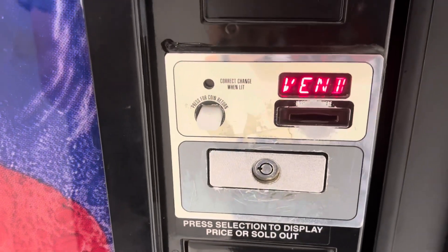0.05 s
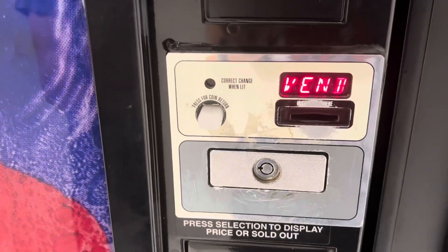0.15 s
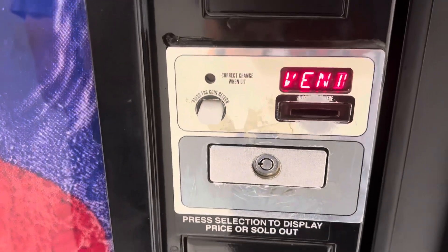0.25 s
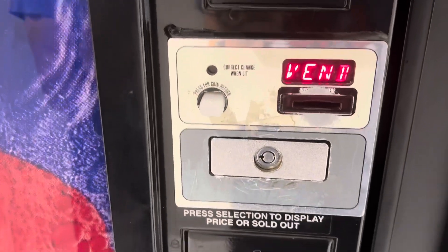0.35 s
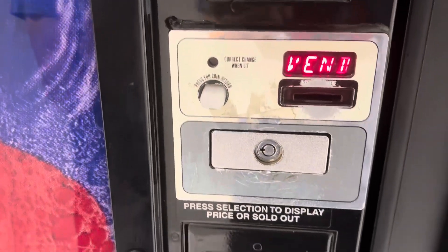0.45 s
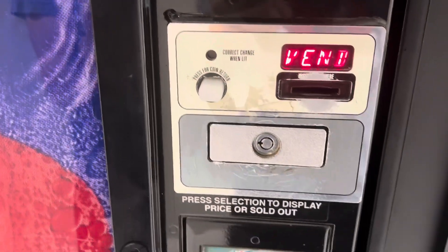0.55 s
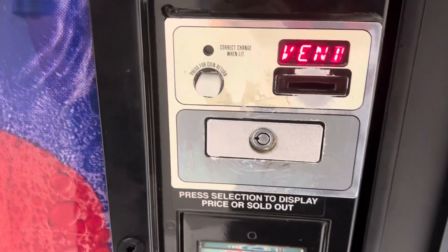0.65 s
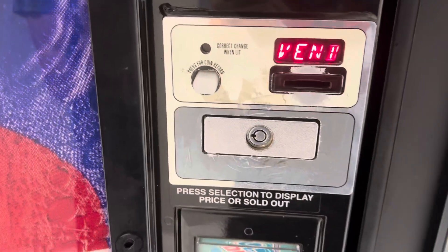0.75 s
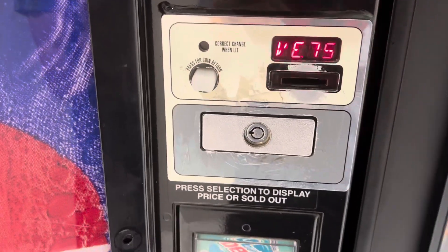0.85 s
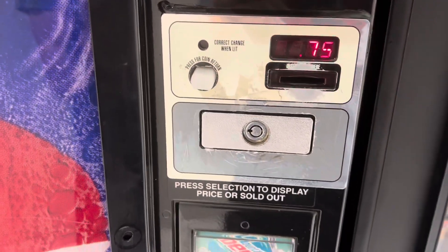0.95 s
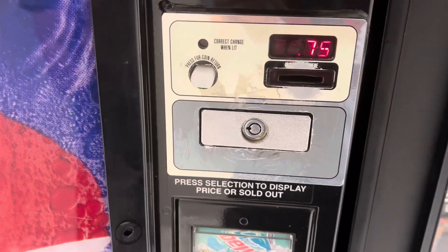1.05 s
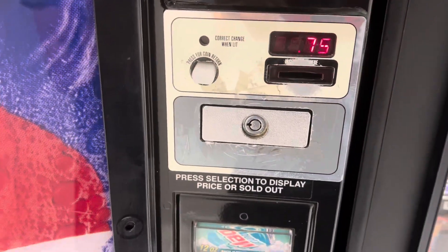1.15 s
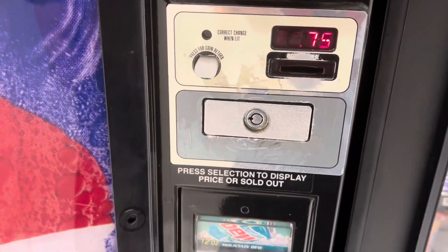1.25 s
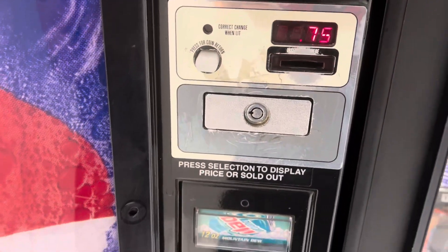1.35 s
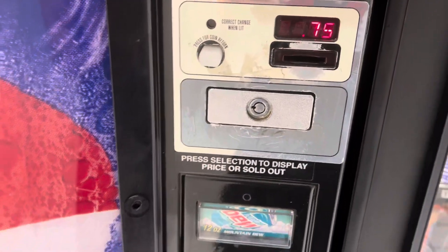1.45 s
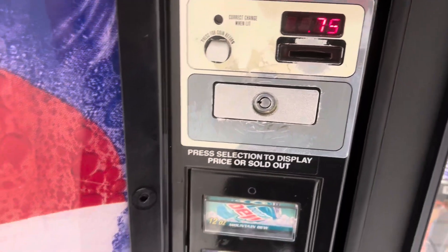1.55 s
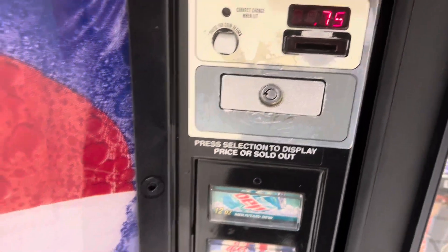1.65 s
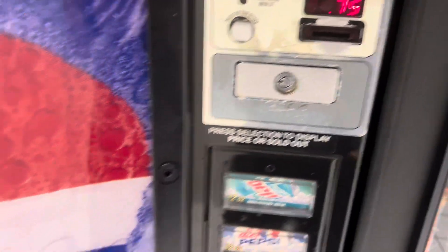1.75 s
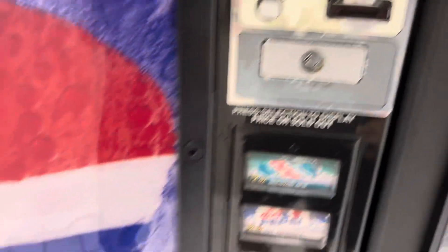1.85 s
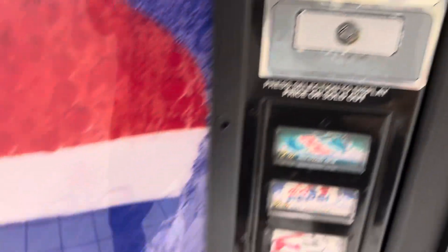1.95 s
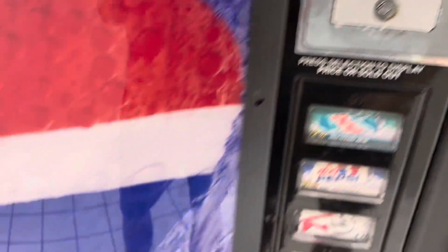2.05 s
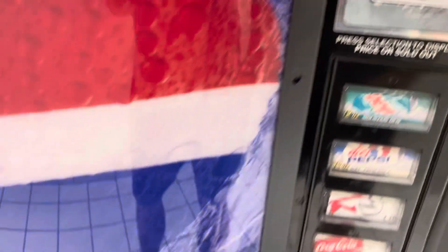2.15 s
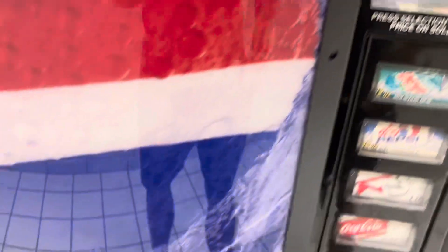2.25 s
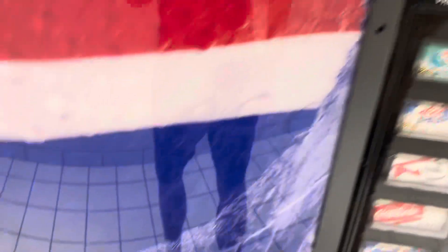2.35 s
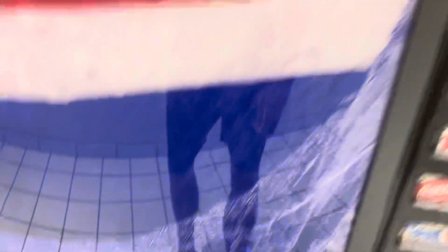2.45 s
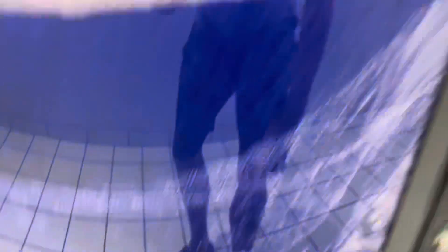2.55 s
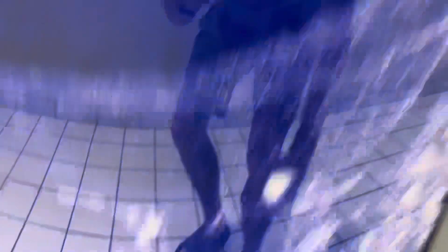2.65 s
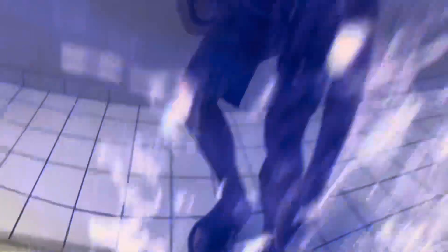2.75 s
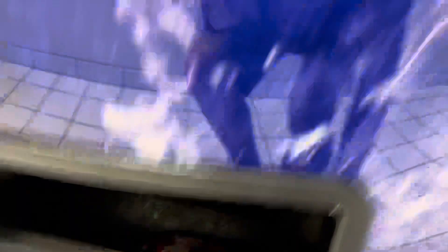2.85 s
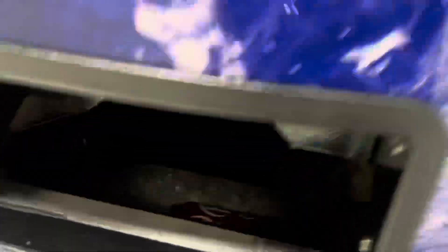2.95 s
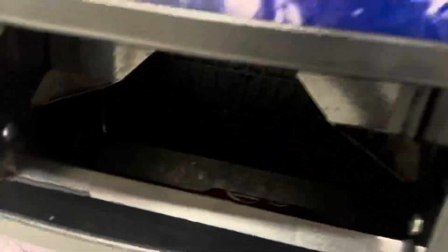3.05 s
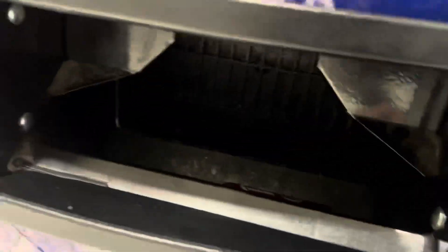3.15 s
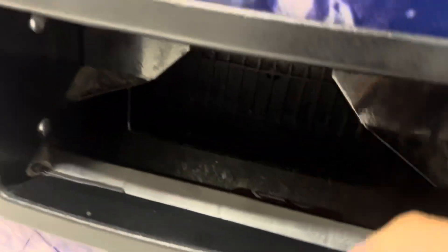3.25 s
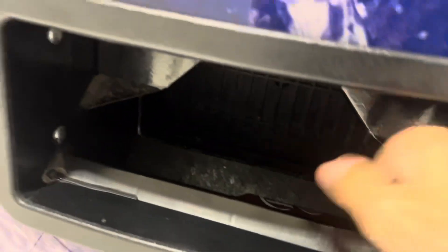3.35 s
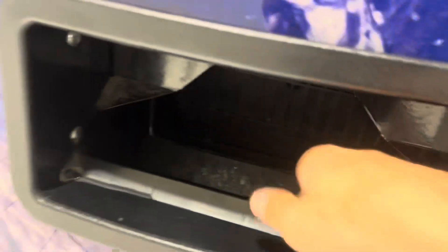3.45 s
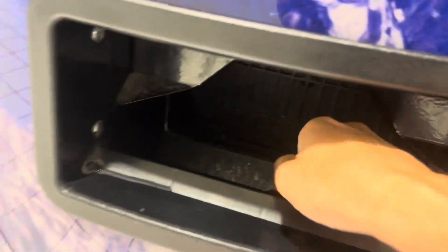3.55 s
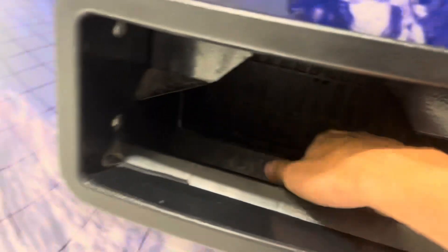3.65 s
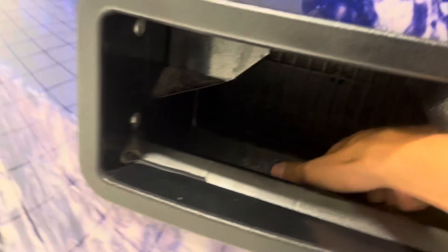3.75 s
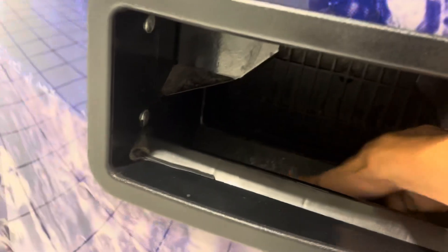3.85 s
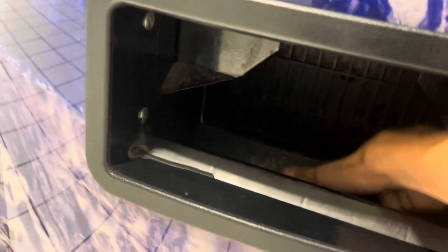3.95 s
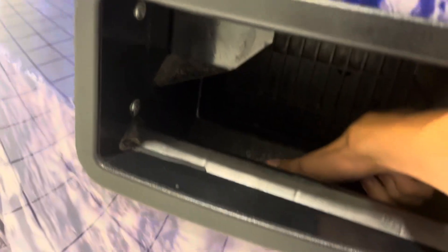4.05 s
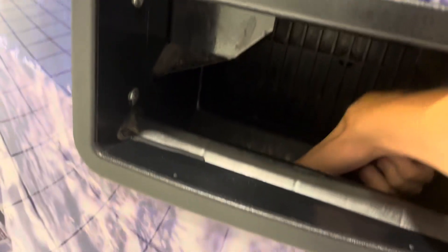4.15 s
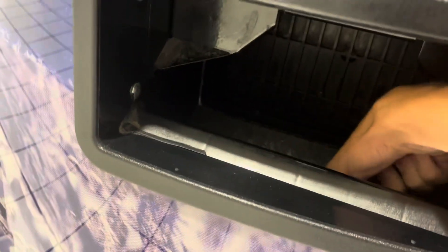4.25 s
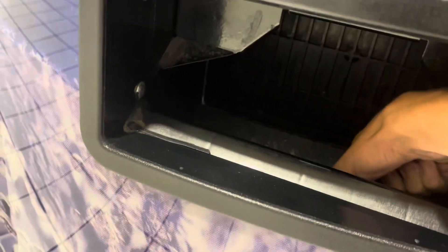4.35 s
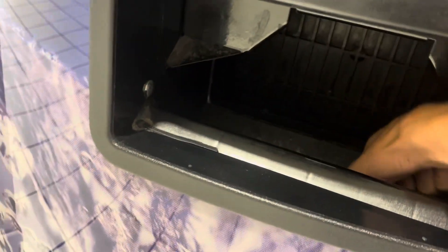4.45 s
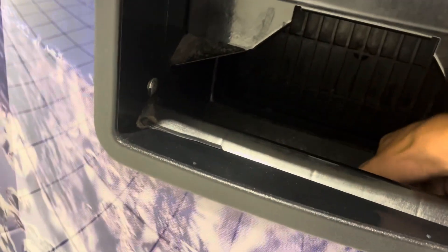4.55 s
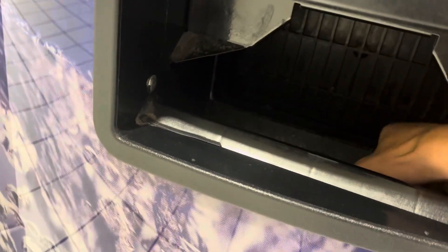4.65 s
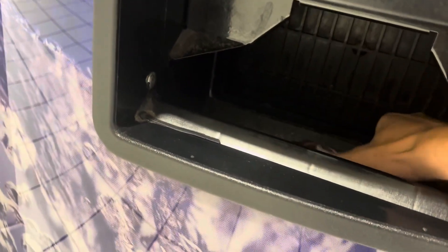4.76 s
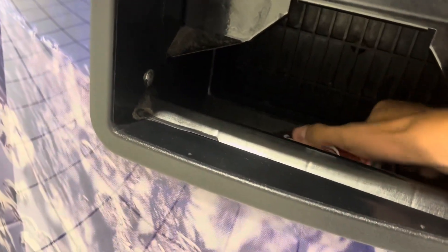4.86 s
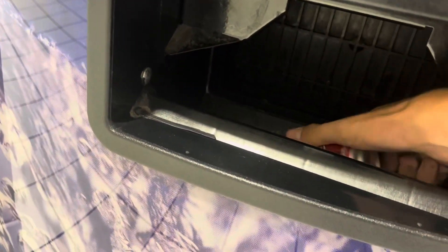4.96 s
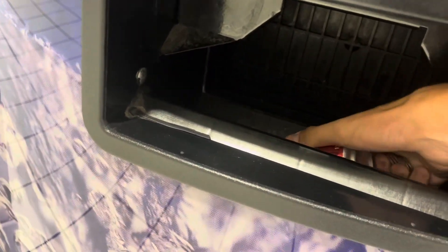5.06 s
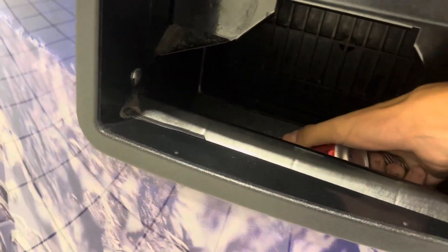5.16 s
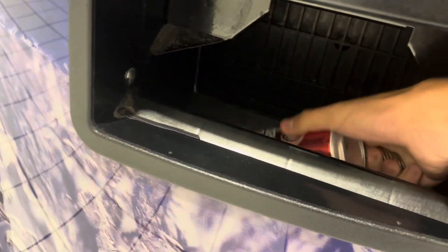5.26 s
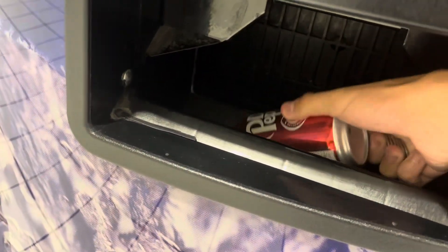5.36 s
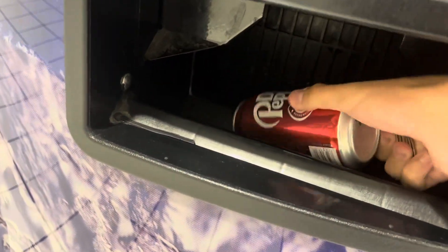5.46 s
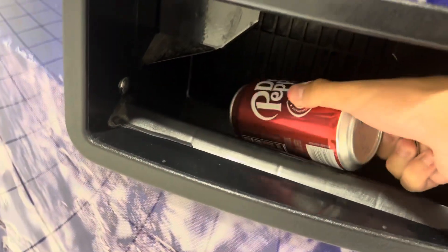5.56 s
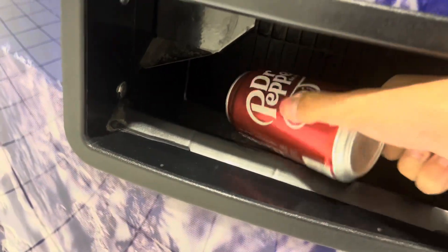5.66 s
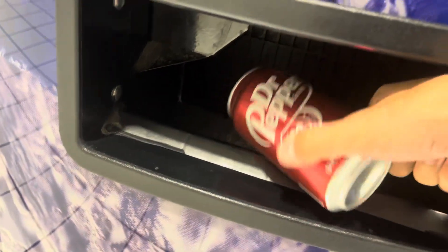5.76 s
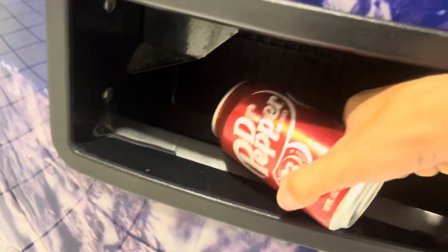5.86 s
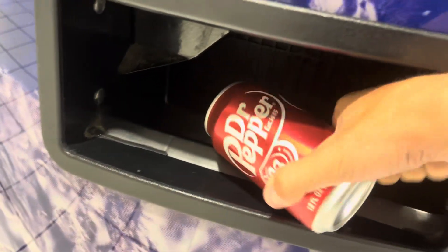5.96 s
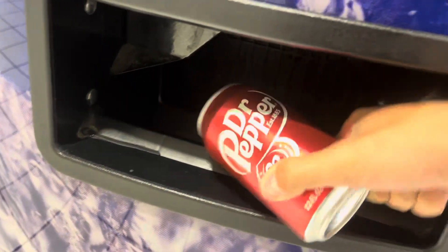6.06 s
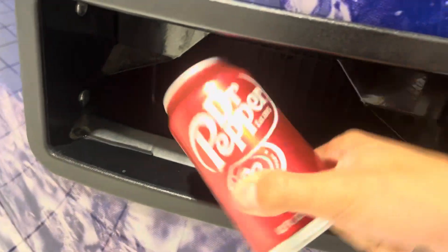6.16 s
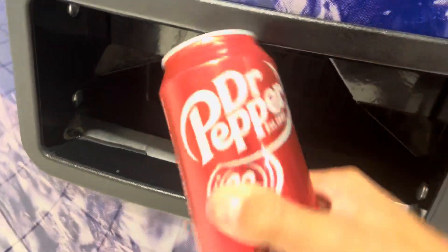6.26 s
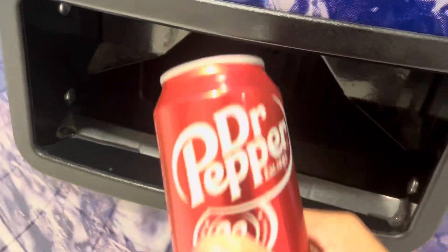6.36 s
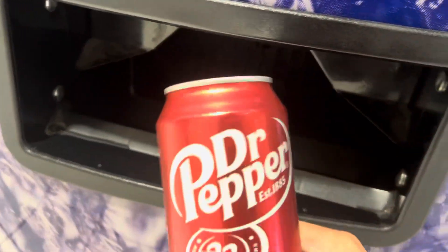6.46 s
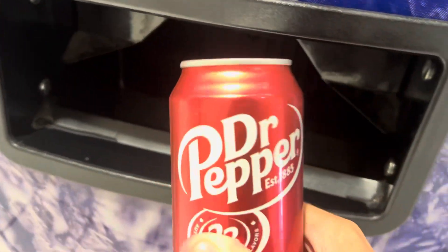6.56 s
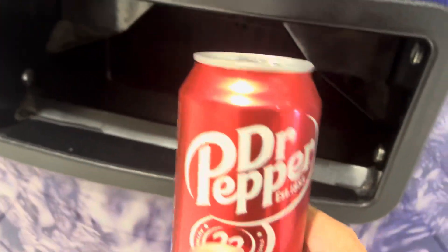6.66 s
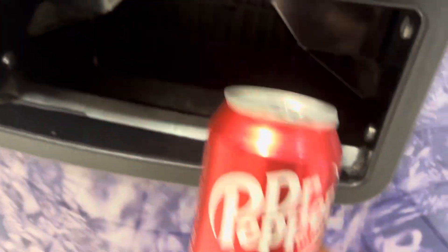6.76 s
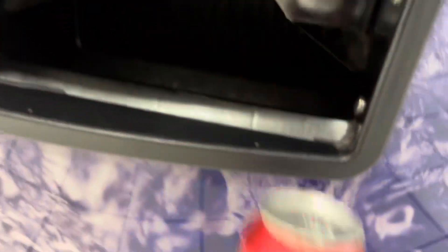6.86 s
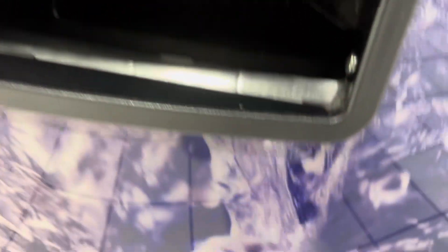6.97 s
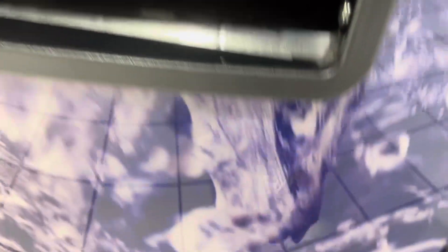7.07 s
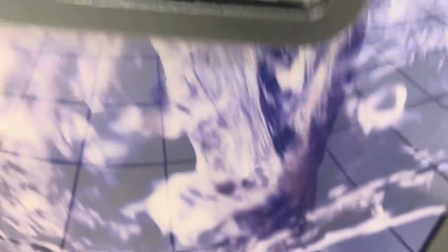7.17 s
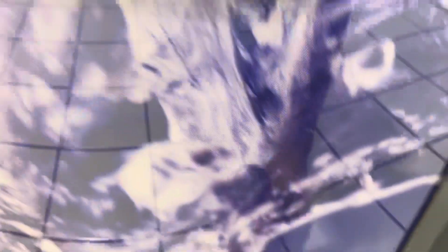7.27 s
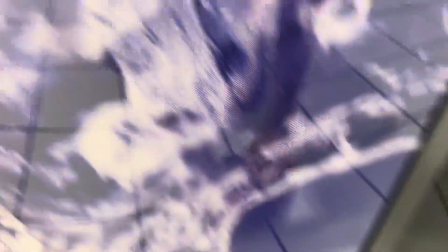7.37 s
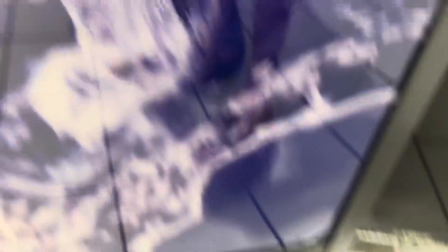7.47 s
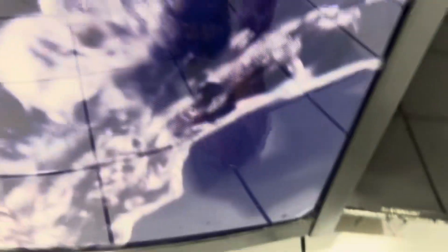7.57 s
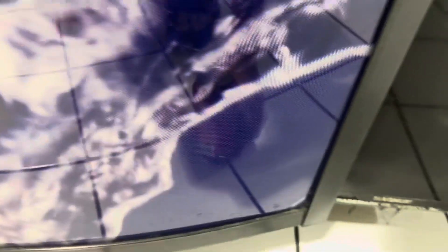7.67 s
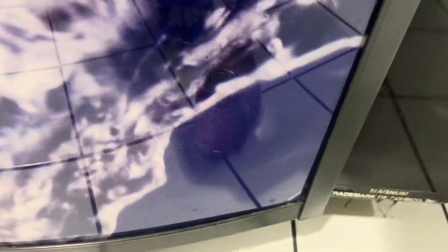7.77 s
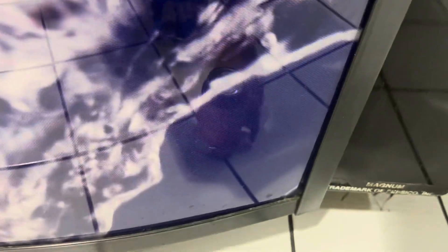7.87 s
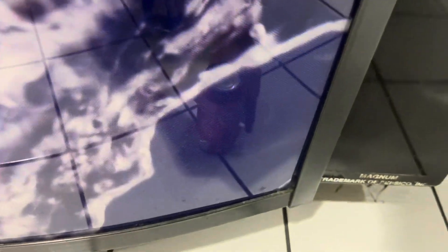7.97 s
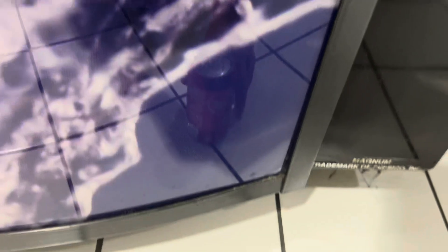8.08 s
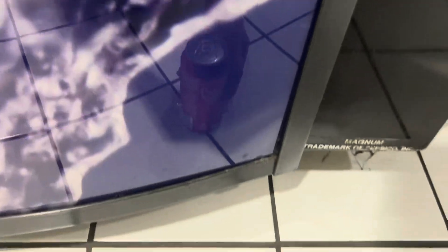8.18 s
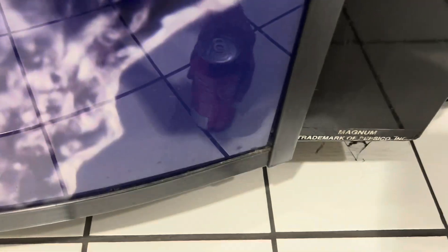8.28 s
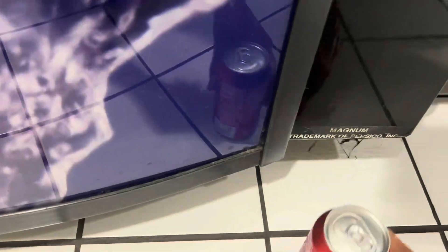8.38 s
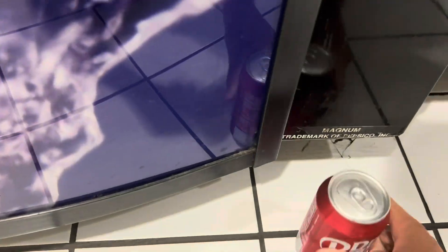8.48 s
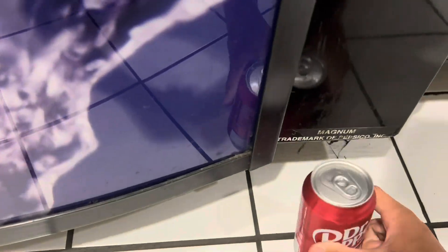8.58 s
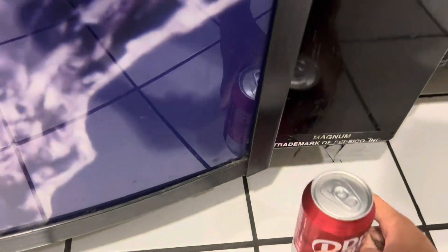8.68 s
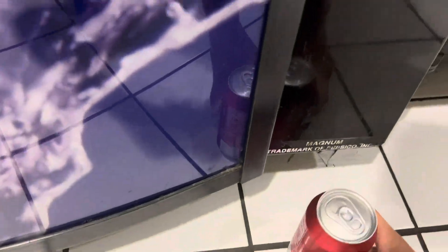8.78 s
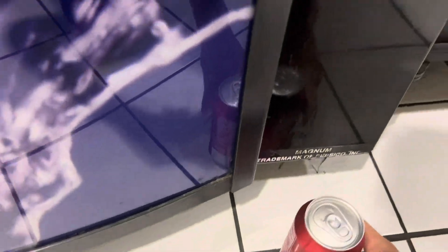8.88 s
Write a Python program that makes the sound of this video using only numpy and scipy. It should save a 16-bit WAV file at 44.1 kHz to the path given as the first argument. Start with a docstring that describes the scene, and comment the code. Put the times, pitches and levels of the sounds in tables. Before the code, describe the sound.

Throughout, a cooler hums: low mains tones throbbing slowly, wavering motor notes and patchy, dark fan noise, growing a little as the microphone nears the bin around 3 s. At 0.6 s a full can starts rattling down the sheet-steel chute; the heaviest hollow bang comes at 1.0 s, with bouncing clatter dying out by about 1.5 s. Only hum and a tiny tick follow until 3.35 s, when a knock with a low thump sounds in the bin. A duller knock comes at 3.9 s, soft rustling from 4.1 s, a solid thud at 4.55 s and the loudest, sharp bang at 4.94 s. Lighter bumps follow at 5.8 and 6.2 s. At 7.4 s the hand-damped can taps tile; from 7.8 s it rocks in a quick, brighter clinking flurry, then scrapes in short gritty strokes around 8.2-8.5 s, with a last tap at 8.76 s. Close, short indoor reflections.

```python
"""Under everything a cooler hums: wavering motor tones over patchy fan noise, heard by a moving hand-held camera.
A full can drops down a vending machine's chute: cracks, thuds and rattling noise ring modes of sheet steel.
A hand then fumbles it out of the steel bin, with more knocks, light ticks and a soft noise rustle.
Last it is stood on a tiled floor, where it rocks and slides: taps and grinding noise ring its wall and rim,
damped by the fingers at first, then free."""
import sys
import numpy as np
from scipy import signal
from scipy.fft import rfft, irfft, next_fast_len
from scipy.io import wavfile
from scipy.ndimage import uniform_filter1d, minimum_filter1d

SR = 44100
rng = np.random.default_rng(int(sys.argv[2]) if len(sys.argv) > 2 else 0)


def volts_from_decibels(level):
    """Turn decibel levels (scalar or array-like) into linear amplitude factors."""
    exponent = np.asarray(level, float) / 20
    return 10 ** exponent


def output_pcm(signal):
    """Save a mono or channel-first signal as 16-bit PCM at the path in sys.argv[1].

    Samples are clipped to [-1, 1] before scaling.
    """
    pcm = np.clip(np.atleast_2d(signal).T, -1, 1) * 32767
    wavfile.write(sys.argv[1], SR, np.round(pcm).astype(np.int16))


N = 393357  # length in samples

# spectrum of fans and room: hz, relative_level_db (per Hz)
AIR_SPECTRUM = [(25, -42), (49, 13), (69, -0.5), (123, -2), (297, -5), (400, -12), (700, -18.5),
                (1000, -18), (1720, -20.5), (2240, -38), (5000, -42.5), (8800, -52.5), (14400, -53)]
# left-right likeness of the air noise: hz, correlation (-1 to 1)
AIR_LIKENESS = [(60, 0.97), (180, 0.83), (530, 0.79), (1580, -0.17), (4700, 0.6), (14000, 0.2)]
# cooler hiss, loudest at the open bin: mode_hz, width_hz, relative_level_db
HISS_MODES = [(2490, 710, -10.5), (3340, 550, -10), (5100, 5100, -26.5)]
# camera moves down to the bin and beside it: time_s, distance_m (to a reflecting surface), closeness_db (to cooler)
CAMERA_PATH = [(.3, 1.33, -3.5), (2.3, 1.29, -2), (2.75, 1.01, -1), (3.1, 0.97, 1), (4.299, 0.84, 1),
               (5.4, 0.91, -1), (6.7, 0.87, -1.5), (7.2, 1.01, 0.5), (8.1, 1.065, 1.5), (8.6, 1.08, 0)]
# slowly throbbing mains tones: pitch_hz, level_db, throb_depth (0-1), throb_phase_rad
MAINS_TONES = [(60, -43, 0.17, 1.6), (120.5, -35, 0.28, 2.6)]
# compressor orders meeting their own reflection: pitch_hz, level_db, reflected_share (0-1), reflection_phase_rad
MOTOR_ORDERS = [(236.5, -49.5, 1, -2.5), (291.5, -42.5, 0.69, -3), (355.3, -43.5, 0.56, 3.5)]
AIR_DB, HISS_DB = -33, -60
AIR_FOLLOWS, TONES_FOLLOW = 0.48, 0.85  # shares of the closeness in dB
THROB_S = 2.84  # period

# hand and sleeve moving near the microphone: start_s, length_s, level_db, rise_s
RUSTLES = [(4.112, 0.18, -51.5, 0.18), (4.386, 0.68, -63, 0.071), (5.172, .47, -59.5, 0.033),
           (6.045, 0.057, -55, 0.01)]

# can base on tile: start_s, strike_db, ring_centre_hz, rim_db (relative to the strike)
TILE_TAPS = [(7.393, -12.5, 844, -2), (7.421, -19, 835, -10.5), (7.438, -20, 830, -26),
             (7.452, -26, 825, -5), (7.789, -9.5, 1780, -15.5), (7.813, -17.5, 2570, -9.5),
             (7.822, -17.5, 2630, -22), (7.848, -14.5, 2570, -5), (7.879, -16, 2630, -10.5),
             (7.903, -15, 2500, -10.5), (7.929, -20.5, 2760, -8), (7.939, -22, 2760, -10),
             (7.957, -22, 2750, -12), (8.285, -17, 1320, -6), (8.361, -24, 2650, -4.5),
             (8.483, -18, 1460, -29), (8.495, -38, 2700, 15), (8.762, -13, 1360, -37),
             (8.77, -25, 2280, -8)]
# can grinding on tile: start_s, length_s, level_db, rise_s
TILE_GRINDS = [(7.43, 0.085, -38, 0.021), (7.59, 0.031, -44.5, 0.014), (7.798, 0.18, -33.5, 0.068),
               (8.09, 0.15, -39.5, 0.065), (8.195, 0.077, -27, 0.042), (8.277, 0.11, -29.5, 0.043),
               (8.39, 0.074, -29.5, 0.0091), (8.758, 0.022, -32.5, 0.0029)]
# can leaning as it slides, so the ring moves between wall modes: time_s, centre_hz
CAN_LEAN = [(8.26, 2310), (8.29, 1320), (8.33, 2700), (8.42, 2700), (8.445, 1320)]
# can wall: mode_hz, width_hz, relative_level_db
CAN_MODES = [(885, 73, -4.5), (1320, 97, 13), (1917, 62, 1.5), (2230, 114, 9), (2654, 130, 10),
             (2804, 200, 5), (4070, 420, 0), (4670, 330, 4), (7430, 2400, -9.5)]
# stiff base rim of the can: mode_hz, width_hz, relative_level_db
RIM_MODES = [(5130, 150, 15.5), (7600, 240, -12), (12000, 5600, 7)]
# fingers damp some can wall modes and free others: change_db, one for each can mode
GRIP_CHANGE_DB = [15, -0.5, 13, -0.5, -17, 9, -14, 4, 1]
LET_GO_S = 7.7  # until then the hand grips the can
RIM_HELD_HZ, RIM_FREE_HZ = 5150, 4830
GRIND_T60_S = 0.16

# can against chute and bin: start_s, thud_drive_db, thud_centre_hz, crack_drive_db, crack_centre_hz
STEEL_KNOCKS = [(0.852, -6.5, 272, -32, 970), (0.897, -7.5, 403, -33, 1010), (0.997, 4.5, 344, -12, 1380),
                (1.146, -5, 406, -30, 1300), (3.345, -11.5, 292, -23.5, 2210),
                (3.894, -8.5, 223, -27, 1350), (4.126, -20, 337, -43, 1190), (4.262, -22.5, 300, -42, 700),
                (4.556, 0.5, 238, -19.5, 830), (4.647, -6, 292, -23.5, 2600), (4.796, -15, 259, -25, 2150),
                (4.9391, 5.5, 300, -7.5, 1250), (5.836, -10, 237, -33.5, 1400),
                (6.221, -15.5, 227, -28, 795)]
# can sliding and rattling on steel: start_s, length_s, force_db, slip_db, cabinet_weight_db
STEEL_TUMBLES = [(0.609, 0.018, -13, -2.5, -20), (0.626, 0.068, -10.5, -3.5, -24.5),
                 (0.734, 0.29, -22, -5.5, -23.5), (0.847, 0.01, -25, 14, -32),
                 (0.9, 0.031, -28.5, 13.5, -30), (0.945, 0.061, -23.5, 6, -14),
                 (1.005, 0.053, -12, 6.5, -21), (1.049, 0.032, -18.5, 7.5, -12.5),
                 (1.109, 0.079, -11.5, -3.5, -27.5), (1.19, 0.018, -19.5, 2, -20.5),
                 (1.223, 0.027, -17.5, 3.5, -27.5), (1.323, 0.093, -29.5, -6, -25),
                 (1.462, 0.02, -21.5, -1.5, -44), (3.337, 0.045, -23, 5.5, -21),
                 (3.408, 0.045, -23.5, 1, -26), (4.634, 0.041, -23, -5, -21), (4.972, 0.016, -32, 7, -25),
                 (4.979, 0.033, -15.5, -11.5, -24), (6.218, 0.036, -16.5, 2, -21.5)]
# where the can rubs sets the strongest modes: time_s, clatter_centre_hz, clatter_db, panel_centre_hz
RUBBING_SPOT = [(.6, 890, 4.5, 273), (.8, 1340, 1.5, 344), (.85, 960, 4.5, 303), (1.2, 980, -1.5, 405),
                (3.3, 2130, -0.5, 298), (4.98, 1200, 8, 394), (6.2, 1890, -0.5, 286)]
# cabinet or panel mode left ringing by a blow: start_s, pitch_hz, level_db (before its rise)
BLOW_THUMPS = [(3.345, 60, -6), (4.65, 71, -16), (4.984, 81.7, -17), (4.991, 423, -17)]
# small bounces of the can rim and finger touches: start_s, drive_db, centre_hz
LIGHT_TICKS = [(0.639, -35, 1920), (0.862, -20.5, 4800), (1.095, -27, 7000), (1.2386, -41, 4500),
               (2.7204, -37, 6500), (3.378, -33.5, 6460), (3.413, -37.5, 6530), (3.5575, -43, 4000),
               (4.467, -37.5, 10800), (4.895, -40, 4140), (4.958, -33, 3200), (4.977, -37, 2630),
               (5.3564, -38.5, 3260), (6.227, -27.5, 2170), (6.238, -32, 3040)]
# cabinet: mode_hz, width_hz, relative_level_db
CABINET_MODES = [(86, 45, 2.5), (128.7, 36.3, 7)]
# sheet steel panel: mode_hz, width_hz, relative_level_db
PANEL_MODES = [(182, 33, 5.5), (258.4, 29, -0.5), (303, 31.4, 3.5), (387.7, 12.8, 4), (423, 17.5, -7.5),
               (601, 44, -11)]
# can shell and bin lip: mode_hz, width_hz, relative_level_db
CLATTER_MODES = [(661, 32, -0.5), (695, 110, 11), (916, 46, 9.5), (1190, 167, 5), (1380, 65, 2),
                 (1618, 75, 4.5), (1914, 65, 3.5), (2150, 60, 0.5), (2424, 120, -2), (2860, 110, -3),
                 (3385, 290, -5), (4110, 120, -7), (4800, 240, -9.5), (6800, 320, -24.5), (7900, 1200, -20),
                 (11600, 2100, -17)]
# bright scrape: hz, relative_level_db (per Hz)
SCRAPE_SPECTRUM = [(2000, -14), (3500, 4), (5000, -1.5), (8000, 2), (14000, 1)]
STEEL_RISE_S, STEEL_T60_S = 0.0021, 0.24
CABINET_RISE_S, CABINET_T60_S = 0.016, 0.34
CLATTER_DB, SCRAPE_DB = -16, -26  # relative to the force, before slip
SCRAPE_PER_SLIP = 2.06  # dB per dB: a fast slip brightens the sound
THUMP_RISE_S, THUMP_T60_S = 0.0057, 0.46
SNAP_DB, SNAP_T60_S = -11, 0.032  # bright edge, driven this far below its crack
FREE_T60_S, MOVING_T60_S = 0.15, 0.055  # rattle of a lone knock; one cut short by the moving can

# phase between the microphone ports: hz, left_lead_rad
PORT_PHASE = [(100, 0.2), (400, 0.15), (1240, 1.1), (2300, 0.55), (7000, 0.17), (9000, 2.61), (12500, 0.49)]
# level between the microphone ports: hz, left_over_right_db
PORT_LEVEL = [(200, 1), (1000, -1.3), (2600, 4), (10000, 0.5)]
# overall tone, with a notch in the treble: hz, relative_level_db
OVERALL_TONE = [(25, -21), (55, 2), (8900, 1), (9600, -16.5), (10700, -26.5), (11300, -12), (14000, -26),
                (15500, -44.5)]
ROOM_T60_S, ROOM_DB = 0.14, -8


def evened(x):
    """Scales to rms 1."""
    return x / np.sqrt(np.mean(x ** 2) + 1e-20)


def read(points, hz):
    """Reads a spectrum on a log-frequency axis."""
    f, value = np.transpose(points)
    return np.interp(np.log(hz + 1), np.log(f + 1), value)


def add(mix, s, sound):
    """Mixes a sound in at a time in seconds."""
    part = mix[..., round(s * SR):][..., :sound.shape[-1]]
    part += sound[..., :part.shape[-1]]


def smooth_noise(samples):
    """Slow random wandering of rms 1."""
    return evened(uniform_filter1d(rng.standard_normal(N), size=samples))


def ring(modes, centre_hz=None, octaves=1., rest=0.33):
    """Energy-1 response of soft-starting modes; a blow favours those near its centre, all get a share."""
    t = np.arange(SR // 5) / SR
    h = np.zeros(len(t))
    for hz, width, db in modes:
        near = 1
        if centre_hz is not None:
            near = rest + np.exp(-(np.log2(hz / centre_hz) / octaves) ** 2)
        soft_decay = width ** 2 * t * np.exp(-2 * np.pi * width * t)
        h += near * volts_from_decibels(db) * soft_decay * np.sin(2 * np.pi * hz * t)
    return h / np.linalg.norm(h)


def colour(points):
    """Causal minimum-phase impulse response of a spectrum, energy 1."""
    hz = abs(np.fft.fftfreq(4096, 1 / SR))
    log_gain = np.log(volts_from_decibels(np.maximum(read(points, hz), -100)))
    h = np.fft.ifft(np.exp(np.conj(signal.hilbert(log_gain)))).real[:2048]
    return h / np.linalg.norm(h)


def gritty(spread_db):
    """Noise of tiny impacts of uneven size, in clumps of a millisecond."""
    sizes = np.minimum(rng.exponential(1, N // 44 + 1), 4)
    clumps = volts_from_decibels(spread_db * sizes).repeat(44)[:N]
    return evened(rng.standard_normal(N) * clumps)


def stroke(start, length, db, rise_s, t60):
    """Gain of a rub that rises, holds to the end of the stroke and dies away."""
    t = np.arange(N) / SR - start
    return np.clip(t / rise_s, 0, 1) ** 2 * volts_from_decibels(db - 60 * np.clip(t - length, 0, 2) / t60)


def together(gains):
    """Unrelated rubbings add in power."""
    return np.sqrt(sum(g ** 2 for g in gains))


def wandering(drive, modes, depth_db, centre_hz=None):
    """Rubbing with a wandering contact: each mode comes and goes; those near the centre ring most."""
    total = np.linalg.norm([volts_from_decibels(db) * np.sqrt(width) for _, width, db in modes])
    out = np.zeros(N)
    for hz, width, db in modes:
        share = volts_from_decibels(db + depth_db * smooth_noise(900)) * np.sqrt(width) / total
        if centre_hz is not None:
            share = share * (0.5 + 0.39 * np.exp(-(np.log2(hz / centre_hz) / 0.54) ** 2))
        out += signal.oaconvolve(drive * share, ring([(hz, width, db)])[:4000])[:N]
    return out


def ports(x):
    """Two close microphone ports hear one source with unlike phase and level."""
    size = next_fast_len(N)
    hz = np.fft.rfftfreq(size, 1 / SR)
    half = volts_from_decibels(read(PORT_LEVEL, hz) / 2) * np.exp(.5j * read(PORT_PHASE, hz))
    return irfft(rfft(x, size) * np.array([half, 1 / half]), size)[:, :N]


def room(x):
    """Sparse decaying reflections of random sign, unlike in the two channels, without bass."""
    taps = np.zeros((2, SR // 2))
    slots = np.arange(200, SR // 2 - 20, 20)
    at = slots + rng.integers(0, 20, (2, len(slots)))
    np.put_along_axis(taps, at, rng.choice([-1., 1.], at.shape) * volts_from_decibels(-60 * at / SR / ROOM_T60_S), 1)
    band = signal.butter(2, [450, 6000], "bandpass", fs=SR)
    taps = signal.lfilter(*band, taps / np.linalg.norm(taps[0]))
    return x + volts_from_decibels(ROOM_DB) * signal.oaconvolve(x, taps, axes=1)[:, :N]


def fan_air():
    """Stereo fan noise whose spectrum swells and thins in patches of time and pitch."""
    frames, hz = N // 256 + 5, np.fft.rfftfreq(1024, 1 / SR)
    a, b, c, d, patches = rng.standard_normal((frames, 513, 5)).T
    patches = evened(uniform_filter1d(uniform_filter1d(patches, 10, 0), 12, 1))
    same = np.clip(read(AIR_LIKENESS, hz), -1, 1)[:, None]
    left = a + 1j * b
    right = same * left + np.sqrt(1 - same ** 2) * (c + 1j * d)
    spectrum = np.array([left, right]) * volts_from_decibels(read(AIR_SPECTRUM, hz)[:, None] + 1.6 * patches)
    return evened(signal.istft(spectrum, nperseg=1024, noverlap=768)[1][:, :N])


def motor_tone(hz, db, share, phase, turns):
    """A sine of drifting pitch and level, beating as a second part turns against it."""
    drift_hz, swell_db = 1.32 * smooth_noise(6000), 2.23 * smooth_noise(6000)
    beating = abs(1 + share * np.exp(1j * (2 * np.pi * turns + phase)))
    sine = np.sin(2 * np.pi * np.cumsum(hz + drift_hz) / SR)
    return np.sqrt(2) * beating * volts_from_decibels(db + swell_db) * sine


def hum():
    """Fan air, cooler hiss and motor tones, each following the closeness of the camera."""
    t = np.arange(N) / SR
    s, *columns = np.transpose(CAMERA_PATH)
    metres, close_db = (np.interp(t, s, column) for column in columns)
    out = volts_from_decibels(AIR_DB + AIR_FOLLOWS * close_db) * fan_air()
    hiss = signal.oaconvolve(gritty(0.55), ring(HISS_MODES))[:N]
    out += volts_from_decibels(HISS_DB + close_db) * ports(hiss)
    follow = volts_from_decibels(TONES_FOLLOW * close_db)
    for row in MAINS_TONES:
        out += follow * motor_tone(*row, t / THROB_S)
    there_and_back_s = 2 * metres / 343  # speed of sound in m/s
    for row in MOTOR_ORDERS:
        out += follow * motor_tone(*row, row[0] * there_and_back_s)
    return out


def hand_rustle():
    """Soft rubbing of the hand: gritty noise through the bright scrape spectrum."""
    gain = together(stroke(*row, 0.057) for row in RUSTLES)
    return signal.oaconvolve(gain * gritty(1.8), colour(SCRAPE_SPECTRUM))[:N]


def can_on_tile():
    """Grinding and taps ring the can wall and its rim, first in the hand, then free."""
    held = [(hz, width, db + grip_db) for (hz, width, db), grip_db in zip(CAN_MODES, GRIP_CHANGE_DB)]
    gripped = np.arange(N) < LET_GO_S * SR
    lean_hz = np.interp(np.arange(N) / SR, *np.transpose(CAN_LEAN))
    grind = together(stroke(*row, GRIND_T60_S) for row in TILE_GRINDS) * gritty(3.2)
    out = wandering(grind * gripped, held, 2.0)
    out += wandering(grind * ~gripped, CAN_MODES, 2.0, lean_hz)
    t = np.arange(900) / SR
    for s, db, centre_hz, rim_db in TILE_TAPS:
        chatter = 0.82 * rng.standard_normal(900) * np.minimum(t / 0.0028, 1)
        sharp_contact = 4.7 * (t == 0)
        blow = volts_from_decibels(db - 60 * t / 0.023) * (chatter + sharp_contact)
        wall, rim_hz = (held, RIM_HELD_HZ) if s < LET_GO_S else (CAN_MODES, RIM_FREE_HZ)
        add(out, s, signal.oaconvolve(blow, ring(wall, centre_hz, 0.2, rest=0.29)))
        rim = ring(CAN_MODES[6:] + RIM_MODES, rim_hz, 0.067, rest=0.25)
        add(out, s, volts_from_decibels(rim_db) * signal.oaconvolve(blow, rim))
    return out


def tumbling(shake):
    """The moving can shakes panel, cabinet, can shell and a bright scrape, by force and slip."""
    force = [stroke(s, length, db, STEEL_RISE_S, STEEL_T60_S) for s, length, db, _, _ in STEEL_TUMBLES]
    slips = [row[3] for row in STEEL_TUMBLES]
    panel = together(force)
    cabinet = together(stroke(s, length, db, CABINET_RISE_S, CABINET_T60_S)
                       for s, length, _, _, db in STEEL_TUMBLES)
    clatter = together(g * volts_from_decibels(CLATTER_DB + slip) for g, slip in zip(force, slips))
    scrape = together(g * volts_from_decibels(SCRAPE_DB + SCRAPE_PER_SLIP * slip) for g, slip in zip(force, slips))
    s, *columns = np.transpose(RUBBING_SPOT)
    clatter_hz, clatter_db, panel_hz = (np.interp(np.arange(N) / SR, s, column) for column in columns)
    out = wandering(clatter * shake * volts_from_decibels(clatter_db), CLATTER_MODES[:13], 3.6, clatter_hz)
    out += wandering(panel * shake, PANEL_MODES, 0.67, panel_hz)
    out += signal.oaconvolve(cabinet * shake, ring(CABINET_MODES, 122, 0.42, rest=0.29))[:N]
    out += signal.oaconvolve(scrape * shake, colour(SCRAPE_SPECTRUM))[:N]
    return out


def struck(modes):
    """The same modes, stronger or weaker at random for the spot that is hit."""
    return [(hz, width, db + 2.5 * rng.standard_normal()) for hz, width, db in modes]


def knock(out, shake, s, thud_db, thud_hz, crack_db, crack_hz):
    """A sharp crack with a bright snap, a thud pressed into the panel and a dying rattle."""
    t = np.arange(SR // 3) / SR
    moving = any(start - .016 < s < start + length for start, length, *_ in STEEL_TUMBLES)
    noise = shake[round(s * SR):][:len(t)]
    rattle = volts_from_decibels(-60 * t / (MOVING_T60_S if moving else FREE_T60_S)) * noise
    # the full can presses the panel in and lets go
    push = 0.13 * np.sin(2 * np.pi * np.minimum(t / 0.0031, 1))
    steel = ring(CABINET_MODES + PANEL_MODES, thud_hz, 0.69, rest=0.26)
    add(out, s + 0.0022, volts_from_decibels(thud_db) * signal.oaconvolve(0.64 * rattle + push, steel))
    crack = 0.5 * rattle + 0.69 * volts_from_decibels(-60 * t / 0.037) * noise + 11 * (t == 0)
    shell = ring(struck(CLATTER_MODES), crack_hz, 0.33, rest=0.7)
    add(out, s, volts_from_decibels(crack_db) * signal.oaconvolve(crack, shell))
    snap = volts_from_decibels(-60 * t[:900] / SNAP_T60_S) * noise[:900]
    add(out, s, volts_from_decibels(crack_db + SNAP_DB) * signal.oaconvolve(snap, colour(SCRAPE_SPECTRUM)))


def thump(hz, db):
    """One low mode of cabinet or panel ringing on as a decaying sine."""
    t = np.arange(SR // 3) / SR
    envelope = volts_from_decibels(db - 60 * t / THUMP_T60_S) * (1 - np.exp(-t / THUMP_RISE_S))
    return envelope * np.sin(2 * np.pi * hz * t)


def tick(noise, db, centre_hz):
    """A light touch: a short noise burst rings the higher clatter modes."""
    burst = volts_from_decibels(db - 60 * np.arange(1500) / SR / 0.025) * noise
    return signal.oaconvolve(burst, ring(CLATTER_MODES[6:], centre_hz, 0.34, rest=0.2))


def machine():
    """Can against steel: tumbling, knocks, thumps and ticks, all but the thumps sharing one gritty shake."""
    shake = gritty(2.9)
    out = tumbling(shake)
    for row in STEEL_KNOCKS:
        knock(out, shake, *row)
    for s, hz, db in BLOW_THUMPS:
        add(out, s, thump(hz, db))
    for s, db, centre_hz in LIGHT_TICKS:
        add(out, s, tick(shake[round(s * SR):][:1500], db, centre_hz))
    return out


def scene():
    """Can and hand sounds in the room, over the hum."""
    return room(ports(machine() + can_on_tile() + hand_rustle())) + hum()


def band_limit(x):
    """A steep low-pass at the top of the band."""
    return signal.sosfilt(signal.butter(12, 14600, fs=SR, output="sos"), x)


def record(dry):
    """Overall tone, with a deep notch in the treble near 10 kHz, then a limiter on the loudest peaks."""
    tone = colour(OVERALL_TONE)
    tone = tone / abs(rfft(tone)[50])  # unity gain near 1.1 kHz
    heard = signal.oaconvolve(dry, tone[None], axes=1)[:, :N]
    allowed = np.minimum(.92 / (abs(heard).max(0) + 1e-9), 1)
    # gain dips around each peak
    heard = heard * uniform_filter1d(minimum_filter1d(allowed, size=151), size=150)
    return band_limit(heard)


dry = scene()
out = record(dry)
output_pcm(out)
```